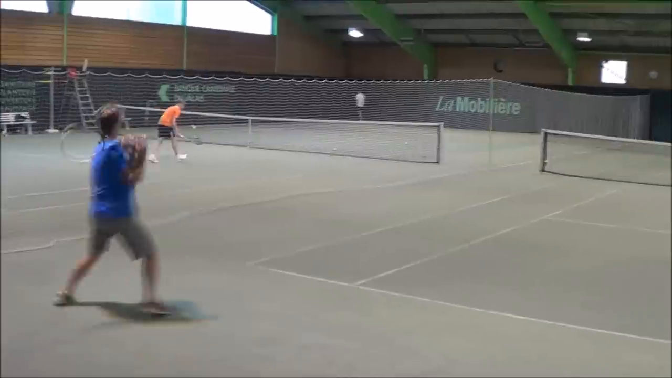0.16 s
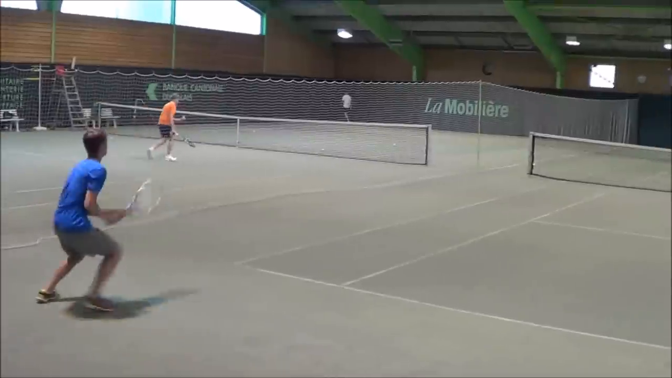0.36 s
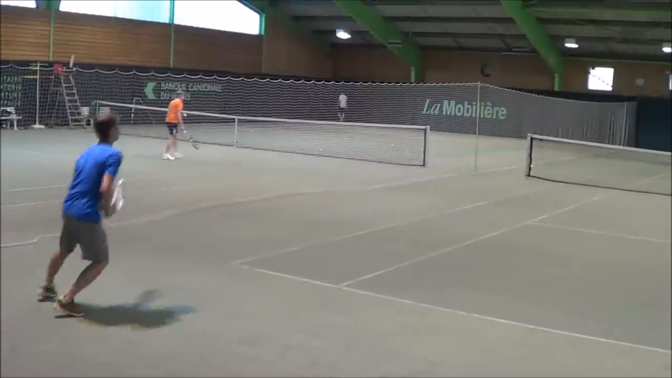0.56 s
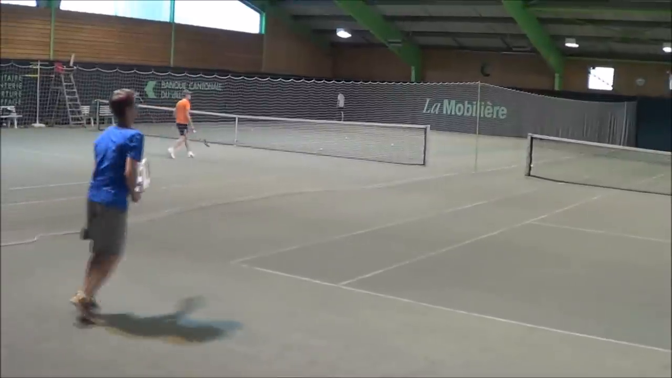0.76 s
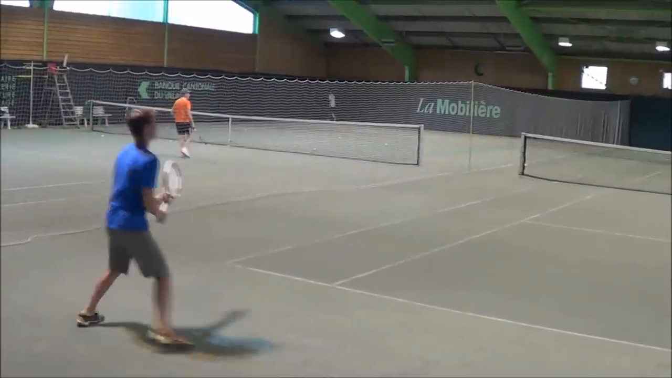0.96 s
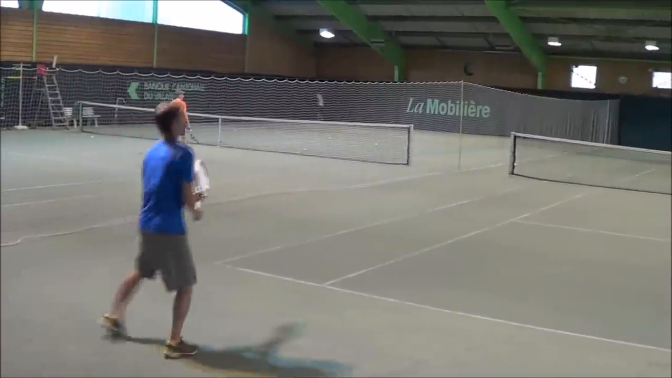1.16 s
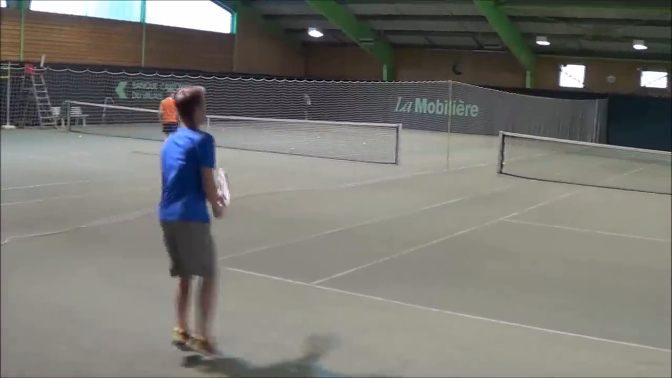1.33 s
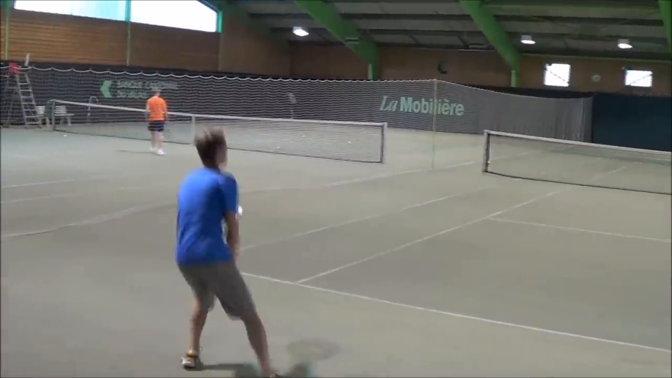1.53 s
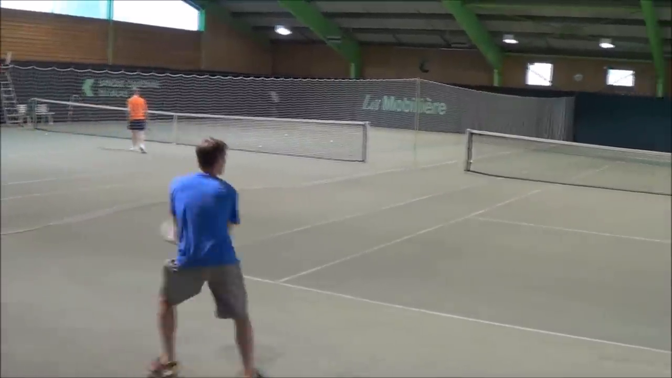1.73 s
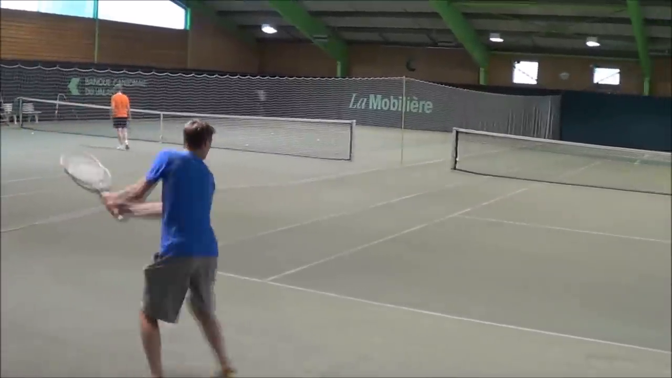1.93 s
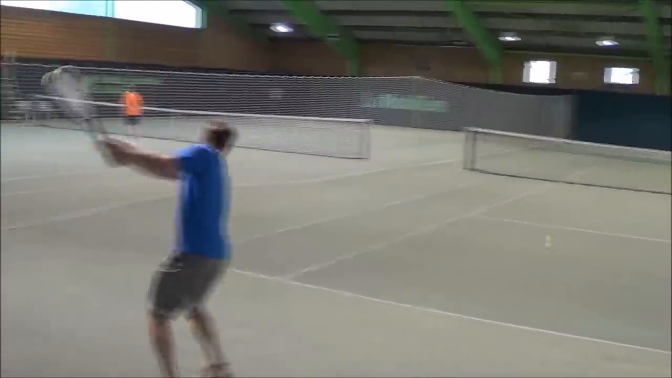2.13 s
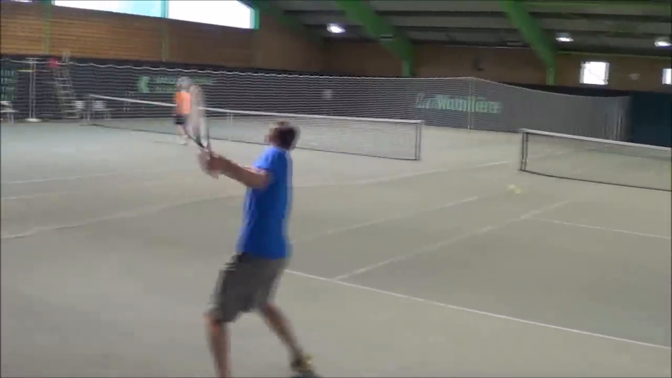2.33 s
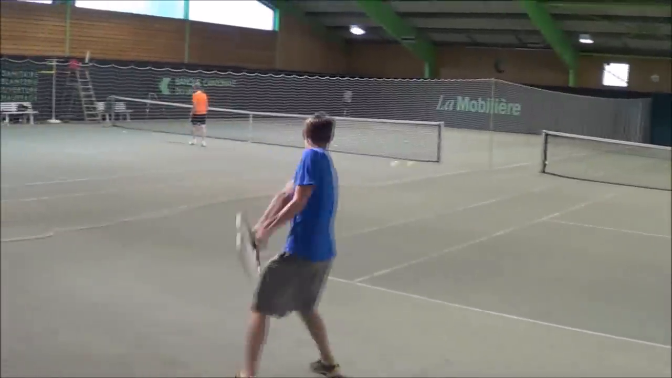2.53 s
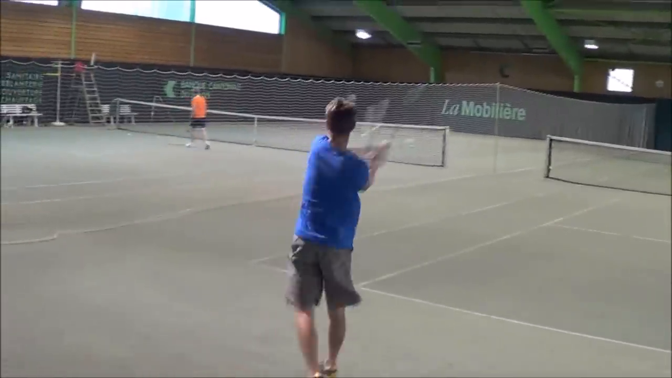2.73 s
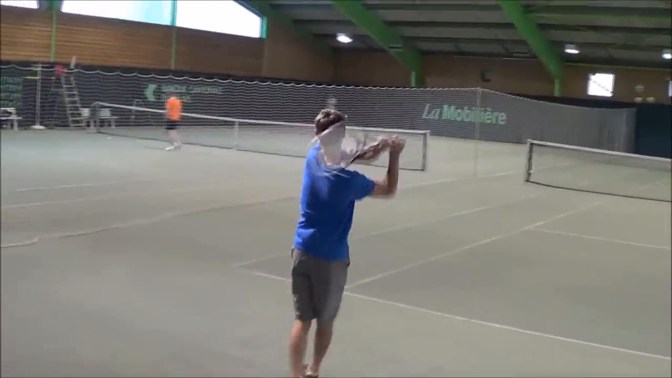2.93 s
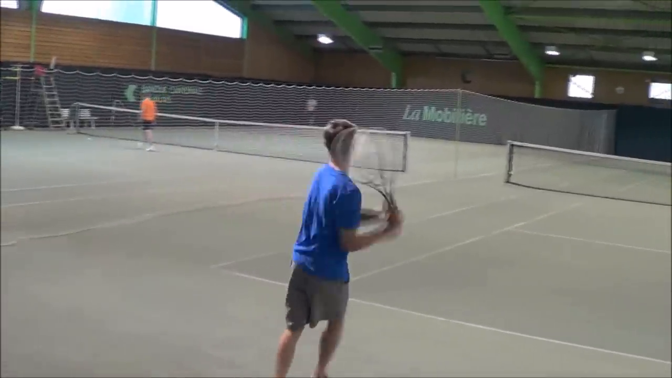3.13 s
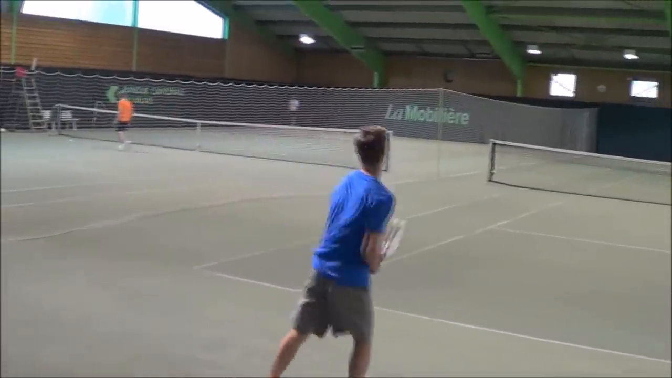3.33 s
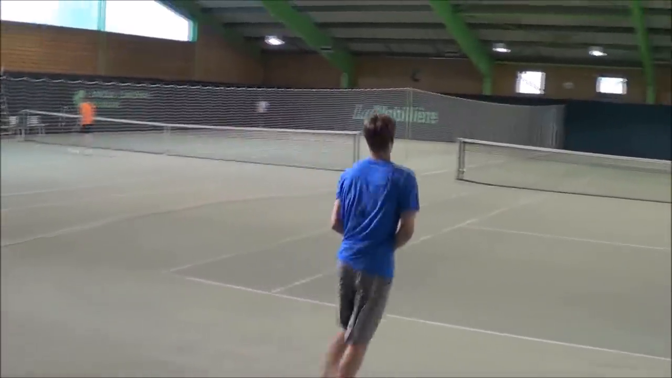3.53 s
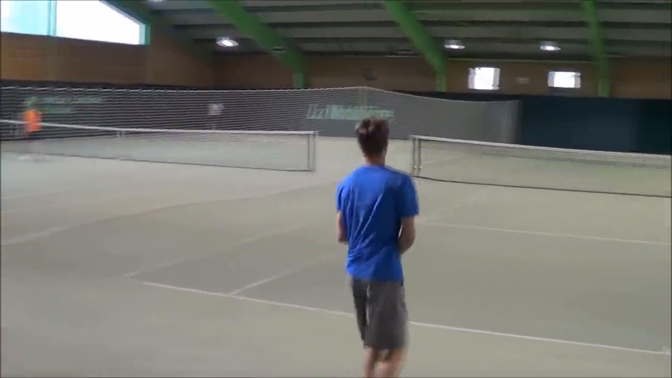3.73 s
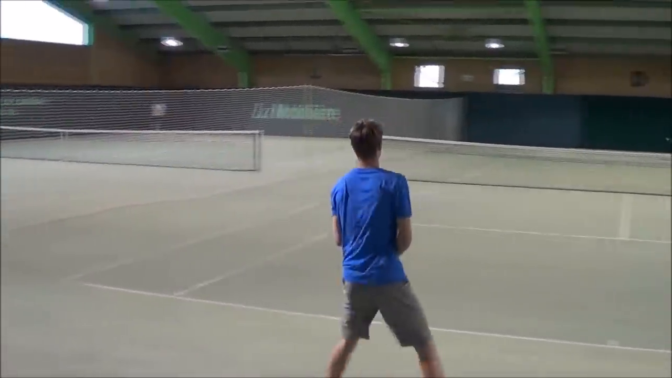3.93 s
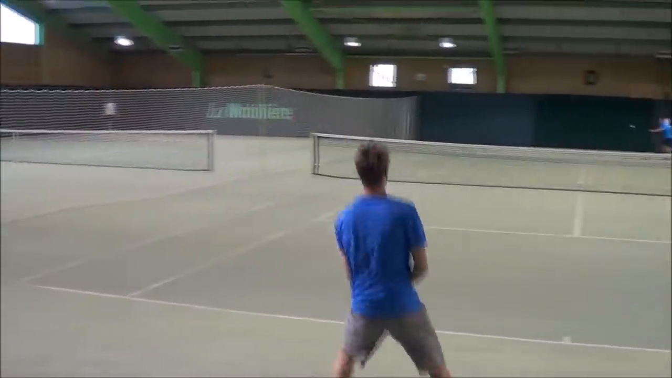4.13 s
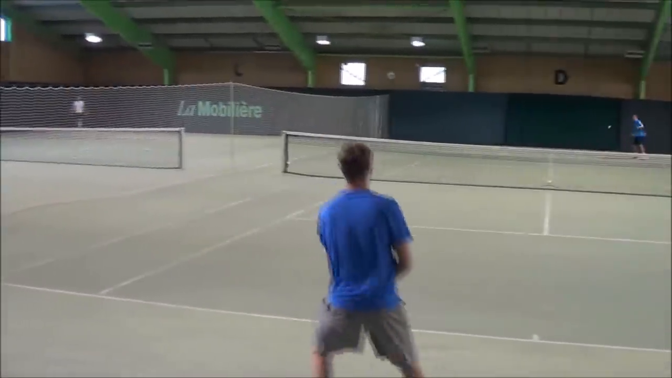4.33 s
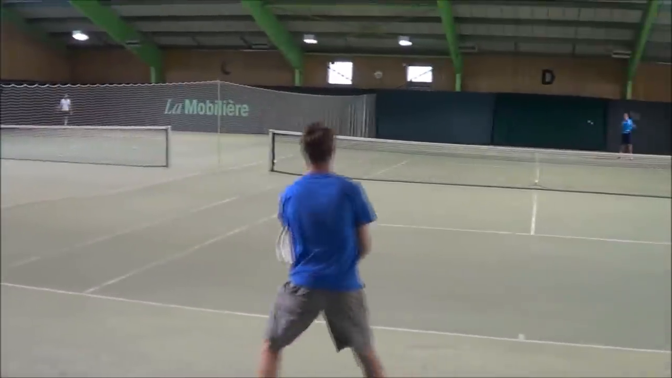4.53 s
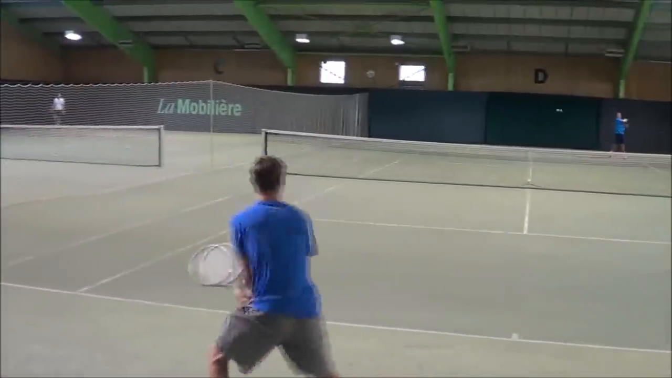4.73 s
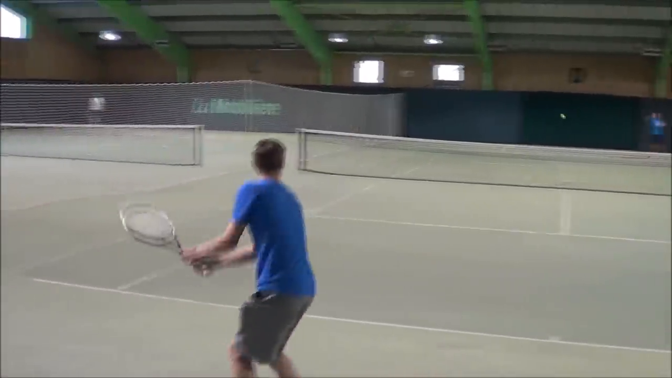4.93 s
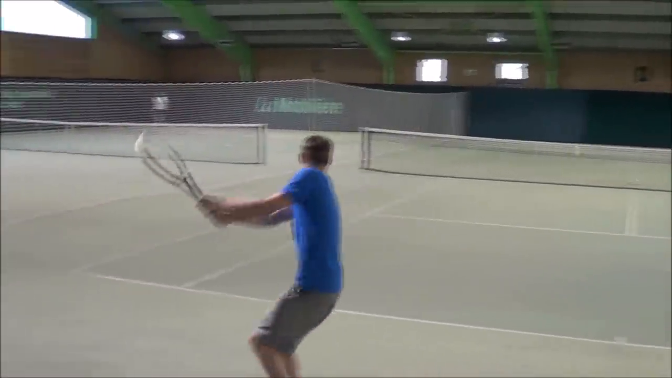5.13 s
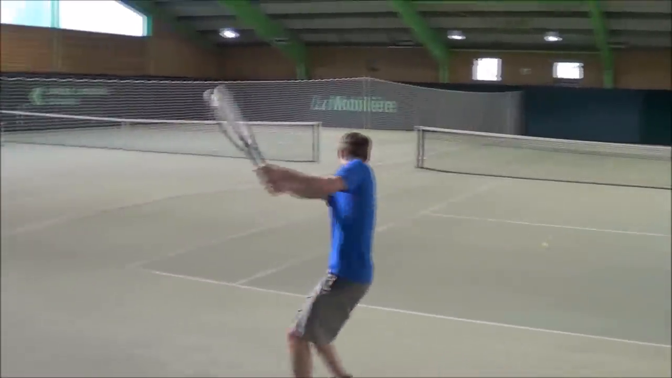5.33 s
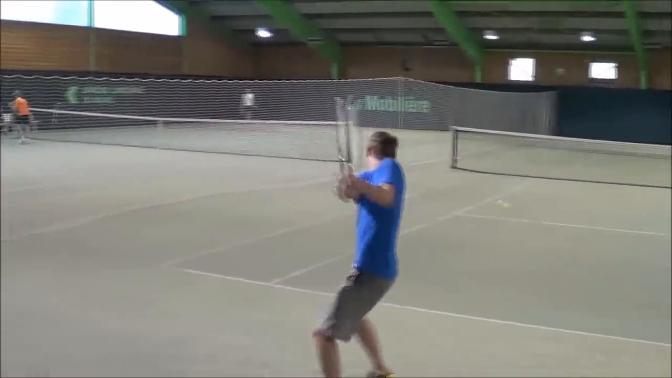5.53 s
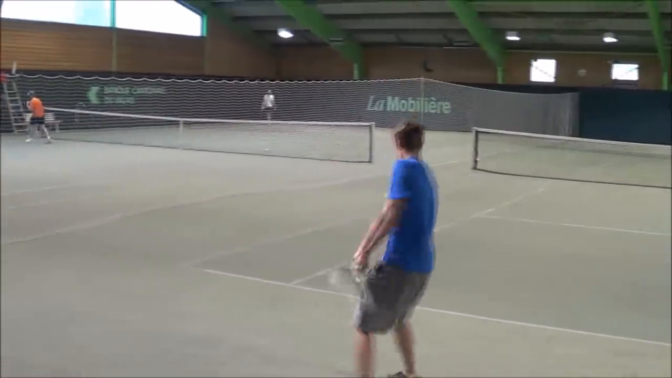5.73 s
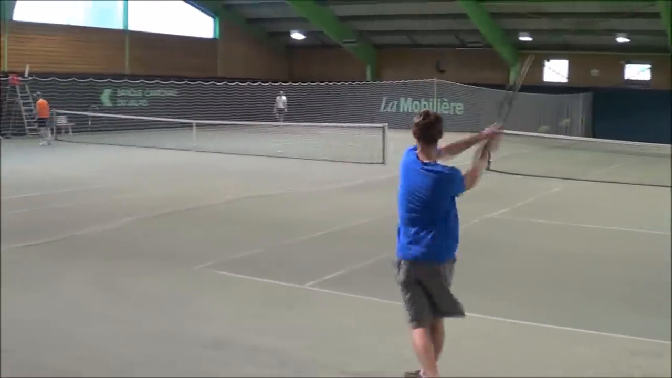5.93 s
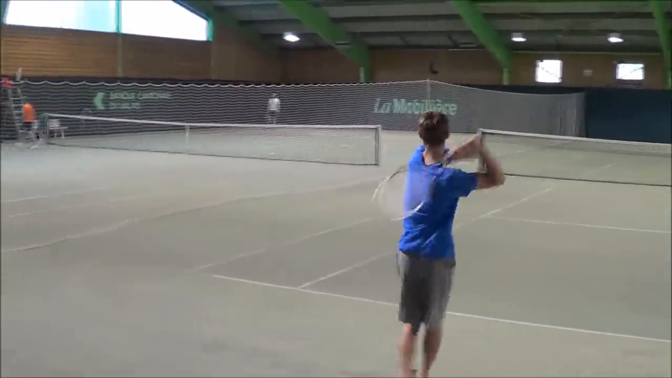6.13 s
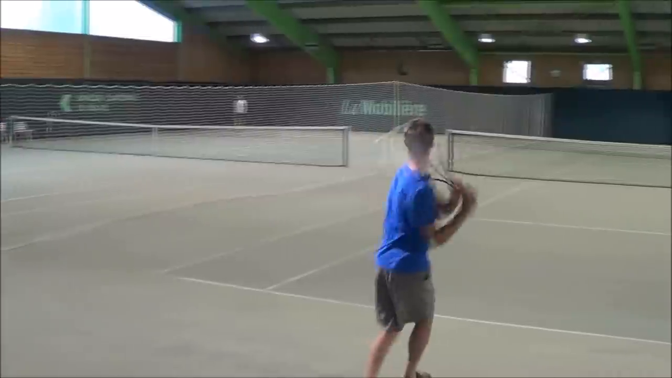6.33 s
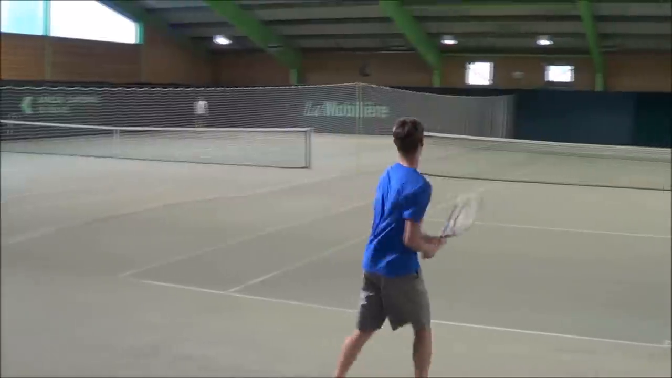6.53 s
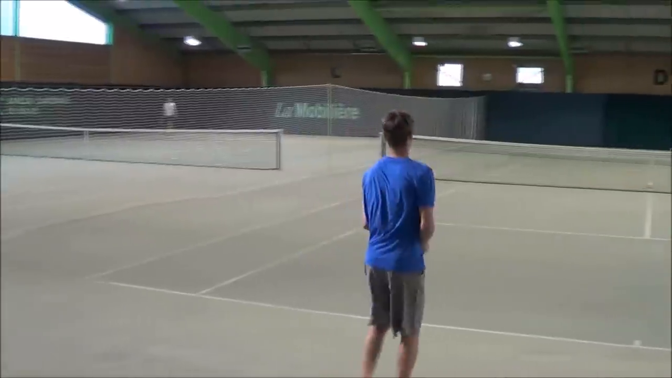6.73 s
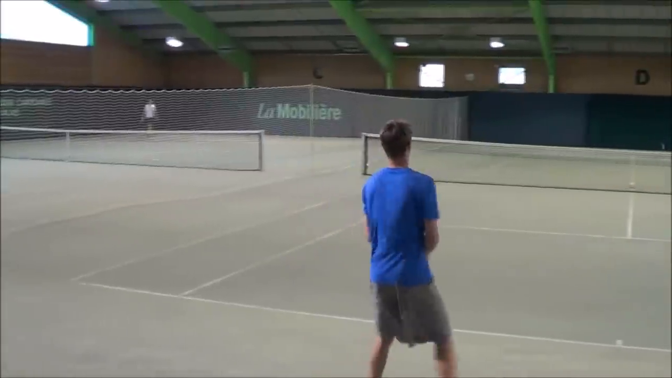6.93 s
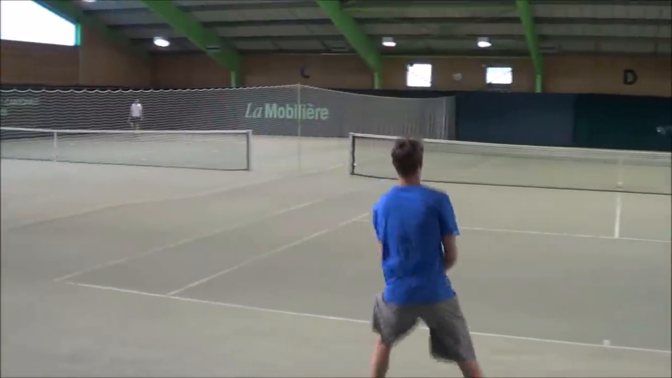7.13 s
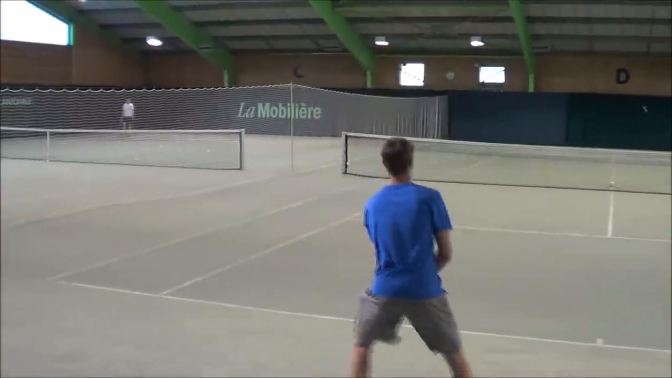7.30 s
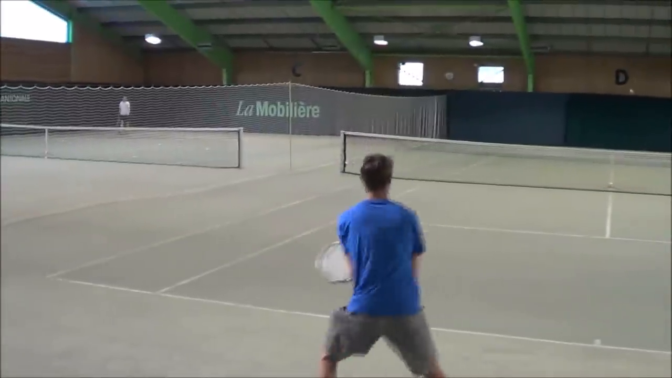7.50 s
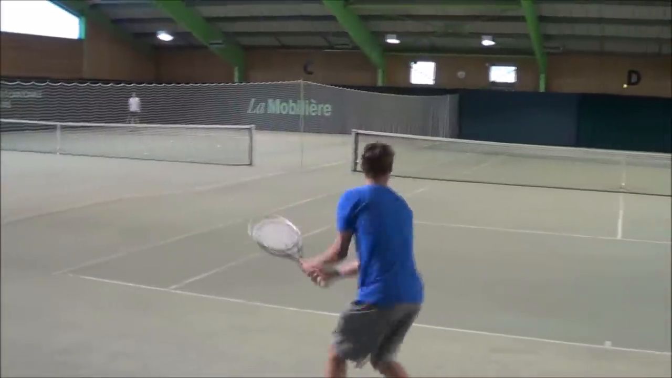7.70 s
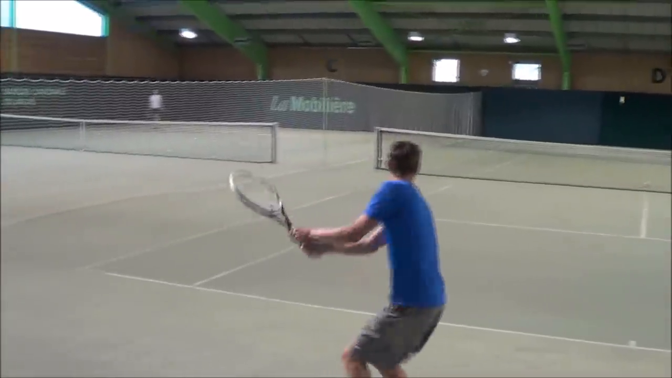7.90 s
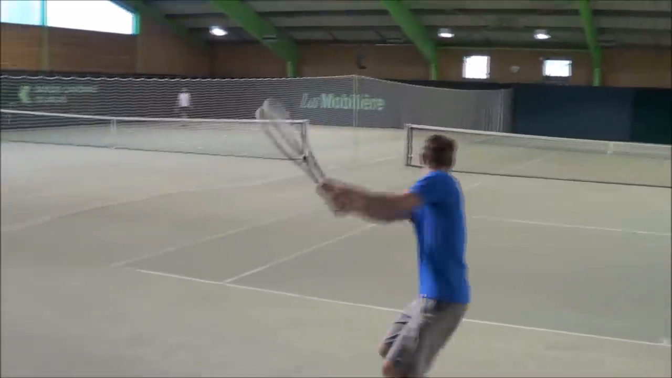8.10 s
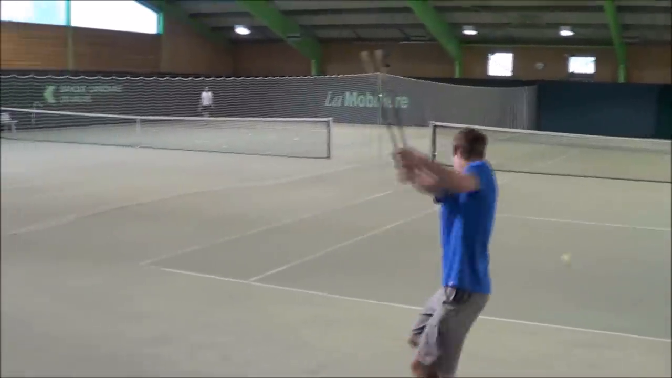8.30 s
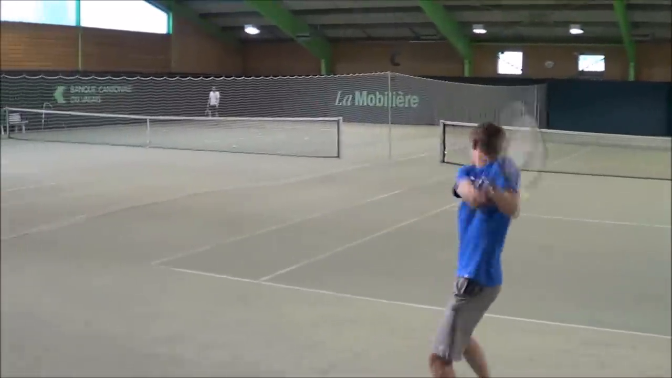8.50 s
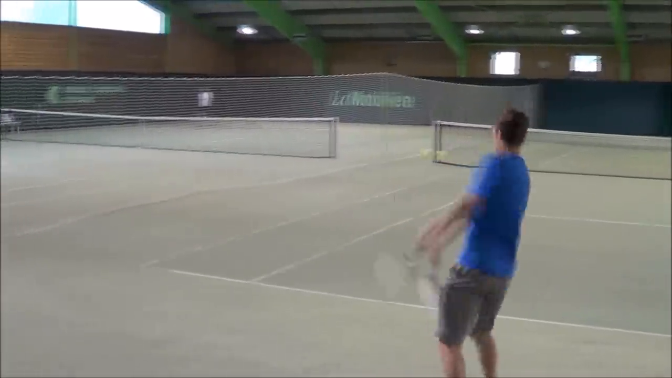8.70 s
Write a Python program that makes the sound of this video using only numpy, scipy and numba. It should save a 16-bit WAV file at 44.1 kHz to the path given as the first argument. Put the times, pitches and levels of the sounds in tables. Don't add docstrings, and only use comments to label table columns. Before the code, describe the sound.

Inside a large, reverberant carpeted tennis hall, a stroke's tail is already ringing as it begins. Shoes scuff and feet thud, neighbouring courts pop dully, the opponent's hit arrives from across the net, the ball bounces, then a racket swishes and cracks loudly nearby. The exchange repeats with a harder near stroke. Ventilation hums throughout; the stereo camcorder microphone sits just behind the near baseline.

```python
import sys
import numpy as np
from scipy import signal
from scipy.fft import rfft, irfft
from scipy.io import wavfile
from scipy.ndimage import uniform_filter1d, minimum_filter1d
from numba import njit

SR = 44100
rng = np.random.default_rng(int(sys.argv[2]) if len(sys.argv) > 2 else 0)


def voltage_ratio(level):
    return 10 ** (np.asarray(level, float) / 20)


def log_audio(samples):
    frames = np.atleast_2d(samples).T
    limited = np.clip(frames, -1, 1)
    pcm = np.round(limited * 32767).astype(np.int16)
    wavfile.write(sys.argv[1], SR, pcm)


N = 386316

# f/Hz, t60/s, level/dB
SHELL = [(344, 0.011, 2), (540, 0.016, -4), (644, 0.036, -6), (210, 0.0057, -13)]


def read(table, hz):
    f, v = np.transpose(table)
    return np.interp(np.log(np.maximum(hz, 1)), np.log(np.maximum(f, 1)), v)


def colour(x, table):
    size = x.shape[-1]
    gain = voltage_ratio(read(table, np.fft.rfftfreq(size, 1 / SR)))
    return irfft(rfft(x) * gain, size)


def unit(x):
    return x / np.sqrt(np.mean(x ** 2))


def add(out, x, s):
    i = int(round(s * SR))
    a, b = max(i, 0), min(i + x.shape[-1], N)
    out[..., a:b] += x[..., a - i:b - i]


def ring(hz, t60, size):
    t = np.arange(size) / SR
    return np.sin(2 * np.pi * hz * t) * np.exp(-np.log(1000) * t / t60)


def ventilation():
    # f/Hz, level/dB per Hz
    air_bands = [(15, -27), (64, 0.5), (143, -4.5), (295, 2.5), (466, -8.5), (841, -11), (1360, -19),
                 (16400, -70)]
    # f/Hz, level/dB per Hz
    hiss_bands = [(300, -36), (1480, -17.5), (3220, -25.5), (9160, -28.5), (14100, -32.5), (16400, -39)]
    # f/Hz, level/dB
    fan = [(30, -17), (44, -8), (54, -4), (66, -14.5), (90, -40), (16000, -90)]
    # t/s, level/dB
    rallies = [
        (0, -34.5),
        (3.2, -37),
        (4.5, -59.5),
        (5.8, -44),
        (7.4, -41.5),
    ]
    # f/Hz, level/dB
    play_bands = [(90, -8), (180, -0.5), (320, 4), (900, -3), (1400, -42), (2500, -26), (5000, -38)]
    swell, fade = 24, 24
    duct_noise = colour(rng.standard_normal((2, N)), air_bands)
    air = unit(duct_noise + colour(rng.standard_normal((2, N)), hiss_bands))
    k = SR // 6
    steps = np.repeat(rng.standard_normal((2, N // k + 1)), k, axis=1)
    wander = uniform_filter1d(steps, k)[:, :N]
    t = np.arange(N) / SR
    activity = sum(voltage_ratio(db - np.maximum(swell * (s - t), fade * (t - s))) for s, db in rallies)
    play = activity * voltage_ratio(3.4 * wander[1]) * unit(colour(rng.standard_normal((2, N)), play_bands))
    rumble = voltage_ratio(-56.0) * unit(colour(rng.standard_normal((2, N)), fan))
    return np.vstack([voltage_ratio(-43 + 1.1 * wander[0]) * air + play + rumble, np.zeros(N)])


def ball(modes, crack_db, crack, contact_s):
    size = int(.08 * SR)
    t = np.arange(size) / SR
    body = sum(voltage_ratio(db) * ring(hz, t60, size) for hz, t60, db in modes)
    body = body * (1 - np.exp(-t / .0015))
    body = np.roll(body, int(contact_s * SR))
    snap = unit(colour(rng.standard_normal(size), crack)) * np.exp(-t / (.001 + .35 * contact_s))
    return body + voltage_ratio(crack_db) * snap


def radiated(hz, modes, crack_db, crack):
    peaks = sum(voltage_ratio(2 * db) * t60 / 0.012 / (1 + ((hz - f) * t60) ** 2) ** 2 for f, t60, db in modes)
    return np.sqrt(peaks + voltage_ratio(2 * (crack_db + read(crack, hz))))


def hall(build_s, late_db=0, source=lambda hz: 1):
    # f/Hz, t60/s
    decay = [(100, 1.3), (260, 2.64), (700, 2.125), (1800, 1.3), (4800, 0.9), (10000, 0.53), (16000, 0.33)]
    # f/Hz, level/dB
    hall_bands = [(60, -56), (150, -3), (300, -6), (800, 0), (1500, -6), (4000, -4.5), (10500, -6.5),
                  (14000, -14)]
    early_db, early_share = 7.5, 0.21
    size = int(2.4 * SR)
    f, t, z = signal.stft(rng.standard_normal((2, size)), SR, nperseg=512)
    t60 = read(decay, f)[:, None]
    clumps = voltage_ratio(4 * np.tanh(rng.standard_normal(len(t))) * np.exp(-t / .07))
    early = voltage_ratio(early_db - 60 * t / (early_share * t60))
    late = voltage_ratio(late_db - 60 * t / t60)
    tone = (source(f) * voltage_ratio(read(hall_bands, f)))[:, None]
    z = z * tone * clumps * np.hypot(early, late)
    tail = signal.istft(z, SR, nperseg=512)[1][:, :size]
    return tail * (1 - np.exp(-np.arange(size) / SR / build_s))


def blows(table, echoes, shell, crack, wet_db, hiss_db, build_s, contact_s, pan_db, late_db):
    # multiple of its ring, t60/s, level/dB
    cavity = [(0.982, 0.027, 0), (1.13, 0.02, -4.5), (0.871, 0.015, -5), (1.89, 0.0024, -7)]
    air_loss = 73
    out = np.zeros((3, N))
    pan = np.array([[1], [np.tanh(pan_db / 66.0)]])
    for s, db, hz, crack_db, thump_db in table:
        modes = [(k * hz, t60, g) for k, t60, g in cavity]
        modes += [(f, t60, g + thump_db) for f, t60, g in shell]
        for delay, echo_db in [(0, 0.03)] + echoes:
            dulled = [(f, g - air_loss * delay * (f / 8000) ** 2) for f, g in crack]
            path = voltage_ratio(db + echo_db) * ball(modes, crack_db, dulled, contact_s)
            add(out[::2], path * pan, s + delay)
        tail = hall(build_s, late_db, lambda f: radiated(f, modes, crack_db + hiss_db, crack))
        add(out[:2], voltage_ratio(db + wet_db) * tail, s)
    return signal.sosfilt(signal.butter(3, 130, "high", fs=SR, output="sos"), out)


def near_strokes():
    # t/s, blow level/dB, ring f/Hz, crack level/dB, thump level/dB
    strokes = [
        (2.877, 0, 852, -11, 2),
        (6.017, 2.5, 843, -9, 0.5),
    ]
    earlier = [
        (-.05, 2.7, 904, -13, 0.29),
    ]
    # delay t/s, level/dB
    echoes = [(.0028, -2.5), (.020, -6), (.010, -6.5), (0.057, -24), (0.118, -10), (.21, -14)]
    # f/Hz, level/dB
    crack = [(80, -45), (250, -28), (1200, 3), (2500, -0.5), (5000, -4.5), (9000, -5.5), (12500, -13),
             (16000, -82)]
    return blows(strokes + earlier, echoes, SHELL, crack, wet_db=1.22, hiss_db=-7.5,
                 build_s=0.0097, contact_s=0.00297, pan_db=0, late_db=0.29)


def landings():
    # peak t/s, level/dB, centre f/Hz, length t/s
    table = [
        (0.18, -41, 210, 0.057),
        (.45, -33.5, 217, 0.041),
        (2.665, -33.5, 260, 0.02),
        (4.243, -41.5, 219, 0.047),
        (7.142, -41.5, 210, 0.039),
        (7.259, -38, 275, 0.0162),
        (8.558, -37.5, 250, 0.019),
    ]
    out = np.zeros((3, N))
    t = np.arange(int(.3 * SR)) / SR
    for s, db, hz, length in table:
        floor = [(hz / 2, -30), (0.74 * hz, 0), (1.4 * hz, -2), (3 * hz, -25), (16000, -90)]
        boards = unit(colour(rng.standard_normal(len(t)), floor))
        add(out[0], voltage_ratio(db) * boards * t / length * np.exp(1 - t / length), s - length)
    return out


def shoes():
    # t/s, level/dB, length t/s
    drags = [(0.134, -34, 0.039), (0.29, -31.5, 0.062), (0.437, -40.5, 0.068), (0.498, -46, 0.094),
             (0.648, -46, 0.029), (0.878, -44, 0.029), (0.913, -42.5, 0.02), (2.011, -37.5, 0.057),
             (2.179, -37, 0.043), (2.538, -42.5, 0.027), (3.482, -42, 0.03), (3.859, -43, 0.028),
             (3.941, -44, 0.035), (3.99, -45, 0.043), (4.298, -39, 0.058), (4.351, -40, 0.06),
             (5.034, -35, 0.032), (5.218, -31, 0.035), (6.195, -30.5, 0.053), (6.253, -34.5, 0.078),
             (6.705, -48, 0.03), (6.815, -47.5, 0.035), (7.306, -37.5, 0.052), (7.798, -37.5, 0.041),
             (7.93, -33, 0.043)]
    # t/s, level/dB, length t/s
    brushes = [(1.157, -36.5, 0.022), (1.665, -39, 0.04), (2.736, -39, 0.011), (3.034, -33, 0.057),
               (3.065, -36, 0.04), (3.158, -42, 0.017), (3.754, -45.5, 0.021), (4.439, -45, 0.02),
               (5.287, -38, 0.0025), (5.305, -34, 0.0018), (5.379, -32, 0.048), (5.438, -36.5, 0.047),
               (5.495, -38, 0.0055), (5.589, -41, 0.019), (6.289, -44, 0.04), (6.999, -41.5, 0.015),
               (7.564, -35.5, 0.028)]
    # t/s, level/dB
    heels = [
        (2.179, -49),
        (2.621, -51),
        (3.035, -27),
        (3.065, -42),
        (5.033, -40),
        (5.218, -38),
        (5.308, -37),
        (6.195, -41),
        (6.253, -37),
    ]
    # f/Hz, level/dB
    pile = [(1500, -28), (3500, 1), (6000, -4), (9500, -2.5), (11500, -13), (13500, -17), (16000, -28)]
    # f/Hz, level/dB
    sole = [(150, -19), (600, 1), (1500, 1), (3000, -8.5), (5000, -33.5), (16000, -64)]
    press_share, tread_db = 0.2, -12
    out = np.zeros((3, N))
    t = np.arange(int(.25 * SR)) / SR
    thud = ring(213, 0.094, len(t)) + ring(260, 0.063, len(t))
    for steps, sole_db in (drags, 8.5), (brushes, 1):
        for s, db, length in steps:
            grains = rng.standard_normal((2, len(t))) * voltage_ratio(1.5 * rng.exponential(size=len(t)))
            press = np.minimum(t / (press_share * length), 1)
            drag = press / (1 + (t / max(length, .001)) ** 4)
            scrape = unit(colour(grains[0], pile)) + voltage_ratio(sole_db) * unit(colour(grains[1], sole))
            add(out[0], voltage_ratio(db - 8) * (scrape * drag + voltage_ratio(tread_db) * thud), s)
    for s, db in heels:
        add(out[0], voltage_ratio(db) * thud, s)
    out[:2] += voltage_ratio(-41.0) * signal.fftconvolve(out[:1], hall(0.021), axes=1)[:, :N]
    return out


def neighbouring_courts():
    # t/s, blow level/dB, ring f/Hz, crack level/dB, thump level/dB
    distant = [
        (0.618, -26, 1040, -24, -5),
        (1.049, -43.5, 1030, 1, 2),
        (1.764, -21.5, 976, -11, -2.5),
        (3.585, -29, 1090, -11, -2),
        (3.988, -45.5, 1080, 1.5, -10),
        (4.618, -32, 1030, -10.5, -31),
        (7.09, -27, 1000, -19, -17),
        (7.155, -47, 1100, -31, -17),
    ]
    next_near = [
        (5.38, -1.5, 924, -23, -3.5),
        (1.161, -24.5, 940, -34, -1),
    ]
    next_far = [
        (4.196, -16, 1130, -22.5, 1.2),
    ]
    # delay t/s, level/dB
    echoes = [(.013, -13), (.031, -5), (.042, -9), (.065, -12)]
    # f/Hz, t60/s, level/dB
    court_shell = [(320, 0.02, 2), (230, 0.0175, -9.5), (510, 0.018, -5), (703, 0.0057, -2)]
    # f/Hz, level/dB
    dull = [(80, -45), (250, -16), (1200, 10.5), (2500, 1.5), (4000, -10), (9000, -12), (16000, -55)]
    out = blows(distant, [], SHELL, dull, wet_db=7.8, hiss_db=-1.0,
                build_s=0.033, contact_s=0.00264, pan_db=-0.74, late_db=0)
    out += blows(next_near, echoes, court_shell, dull, wet_db=-6.0, hiss_db=2.0,
                 build_s=0.0087, contact_s=0.0041, pan_db=0.35, late_db=-3.5)
    out += blows(next_far, echoes, court_shell, dull, wet_db=-4.5, hiss_db=2.1,
                 build_s=0.022, contact_s=0.00395, pan_db=0.5, late_db=8.5)
    return out


def far_strokes():
    # t/s, blow level/dB, ring f/Hz, crack level/dB, thump level/dB
    strokes = [
        (1.483, -6, 910, -17.5, -0.5),
        (4.714, -3, 917, -16.5, -3),
        (7.420, -10.5, 912, -9.5, 7),
    ]
    # delay t/s, level/dB
    echoes = [(.0035, 2), (.011, 3.5), (0.023, 2), (0.03, 2.5), (.053, 0.5), (.085, 1), (0.133, -33)]
    # f/Hz, level/dB
    crack = [(80, -45), (250, -35), (1200, 9.5), (2500, 0.5), (5000, -4.5), (9000, -6.5), (12000, -9),
             (14500, -70)]
    return blows(strokes, echoes, SHELL, crack, wet_db=8.96, hiss_db=-7,
                 build_s=0.0085, contact_s=0.00336, pan_db=-0.97, late_db=0)


def bounces():
    # t/s, blow level/dB, ring f/Hz, slap level/dB, thump level/dB
    table = [
        (1.983, -16.5, 923, -7, 0),
        (2.341, -20, 1100, -7, 0),
        (5.557, -17, 950, -9, -1),
    ]
    close = [
        (8.506, -26.5, 1010, 5.6, 9.3),
    ]
    # delay t/s, level/dB
    echoes = [(.011, -8), (.020, -8), (.029, -12)]
    # f/Hz, t60/s, level/dB
    floor_shell = [(229, 0.043, 3), (332, 0.0095, -3), (567, 0.0033, -5.5)]
    # f/Hz, level/dB
    felt = [(80, -45), (250, -48), (1200, 9), (2500, 5), (5000, -7), (9000, -14), (12000, -23),
            (16000, -55)]
    out = blows(table, echoes, floor_shell, felt, wet_db=4.7, hiss_db=-15.5,
                build_s=0.0075, contact_s=0.00023, pan_db=-0.22, late_db=-0.29)
    out += blows(close, echoes, floor_shell, felt, wet_db=0, hiss_db=-12.0,
                 build_s=0.016, contact_s=0.00033, pan_db=-0.23, late_db=-20)
    return out


def swings():
    # contact t/s, length t/s, level/dB
    table = [
        (2.877, 0.16, -36.5),
        (4.712, 0.035, -42),
        (6.017, 0.11, -34),
    ]
    # f/Hz, level/dB
    swish = [(200, -1), (700, 20.5), (2000, 12), (4000, 3.5), (9000, 2.5), (12000, -3), (16000, -11)]
    out = np.zeros((3, N))
    for s, length, db in table:
        speed = np.sin(np.linspace(0, 1.8, int(length * SR)))
        rush = unit(colour(rng.standard_normal(len(speed)), swish))
        add(out[0], voltage_ratio(db) * speed * rush, s - length)
    return out


def scene():
    # f/Hz, phase/rad
    lead = [(40, -.3), (170, -.65), (340, -.95), (1200, -1.0), (2000, -.75), (4100, -.1), (7700, .25),
            (10500, 0)]
    # f/Hz, level/dB
    unrelated = [(90, -9.5), (200, -20), (700, -17), (1300, -10), (4000, -8), (10000, -4), (11800, -36),
                 (16000, -40)]
    # f/Hz, level/dB
    balance = [(60, 1), (150, -.5), (300, -1.3), (4000, -1.8), (8000, 0), (16000, 0)]
    shared, apart, side = (ventilation() + near_strokes() + landings() + shoes() + neighbouring_courts()
                           + far_strokes() + bounces() + swings())
    hz = np.fft.rfftfreq(N, 1 / SR)
    port = np.exp(.5j * read(lead, hz)) * voltage_ratio(read(balance, hz) / 2)
    differ = colour(apart, unrelated) + colour(side, [(8000, 23.5), (10500, -40)])
    left = irfft(rfft(shared + differ) * port, N)
    right = irfft(rfft(shared - differ) / port, N)
    return np.array([left, right])


@njit
def gain_control(x, top, power, attack, release):
    gain, e = np.empty(len(x)), 0.
    for i in range(len(x)):
        e += (x[i] - e) * (attack if x[i] > e else release)
        gain[i] = (top / max(e, top)) ** power
    return gain


def line_whine():
    sidebands = dict(zip(range(-3, 3), [-81, -79, -74, -63.5, -75, -79]))
    t = np.arange(N) / SR
    drift = 1.2 * np.cumsum(rng.standard_normal(N)) / np.sqrt(SR)
    return sum(np.sqrt(2) * voltage_ratio(db) * np.sin(2 * np.pi * (15625 + k * 50) * t + drift)
               for k, db in sidebands.items())


def top_cut(x):
    return signal.sosfilt(signal.butter(12, 16480, fs=SR, output="sos"), x)


def record(dry):
    peaks = -minimum_filter1d(-np.abs(dry).max(axis=0), size=129)
    attack, release = 1 / (0.0001 * SR), 1 / (0.038 * SR)
    x = dry * gain_control(peaks, 0.19, 0.26, attack, release)
    x = colour(.8 * np.tanh(x / .8), [(15700, 0), (16100, -45)])
    mix = x + line_whine()
    return top_cut(mix)


dry = scene()
out = record(dry)
log_audio(out)
```